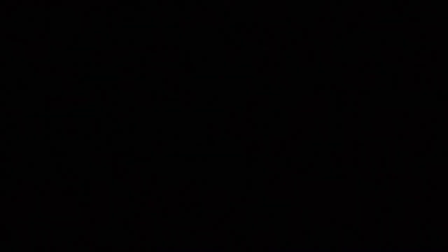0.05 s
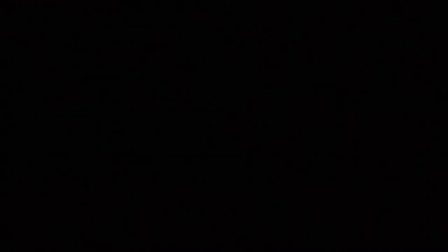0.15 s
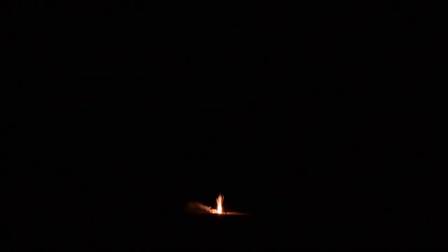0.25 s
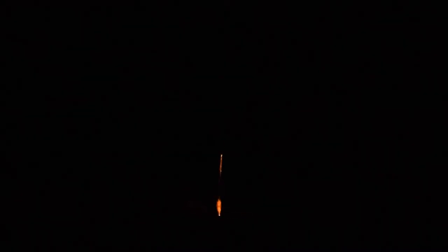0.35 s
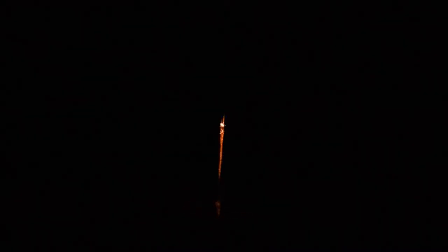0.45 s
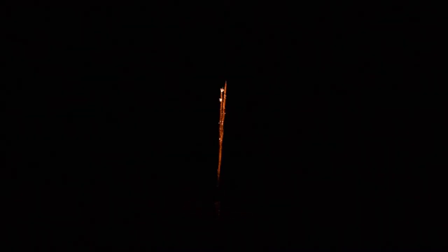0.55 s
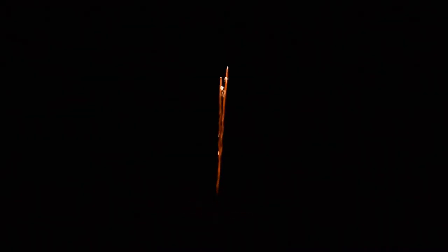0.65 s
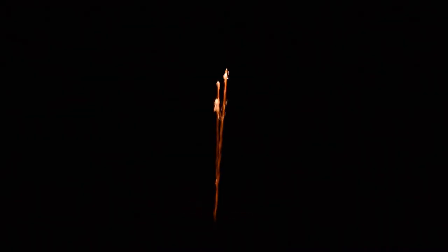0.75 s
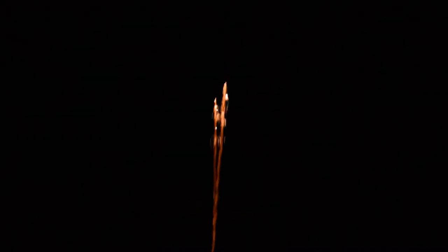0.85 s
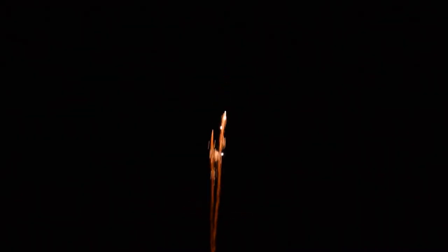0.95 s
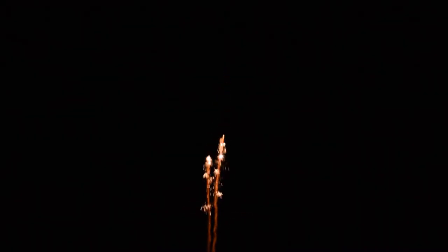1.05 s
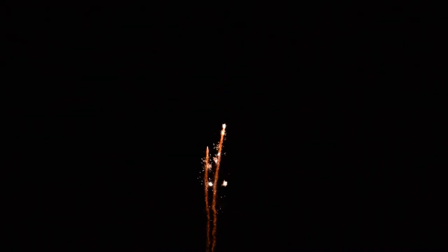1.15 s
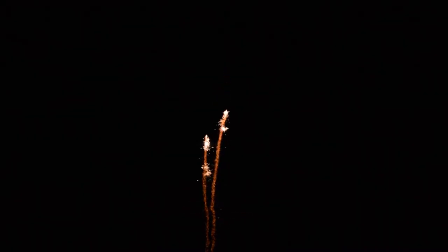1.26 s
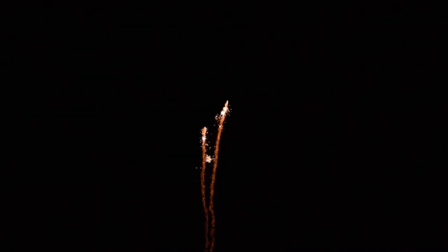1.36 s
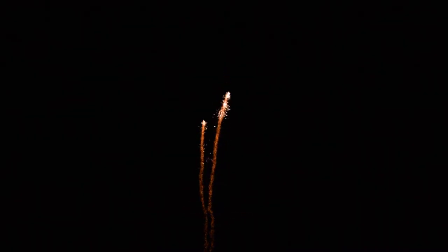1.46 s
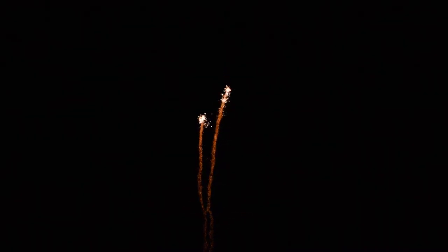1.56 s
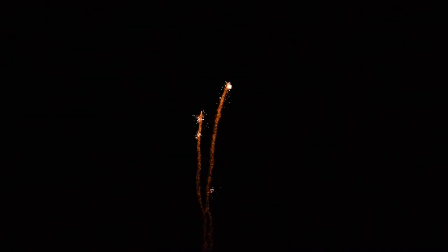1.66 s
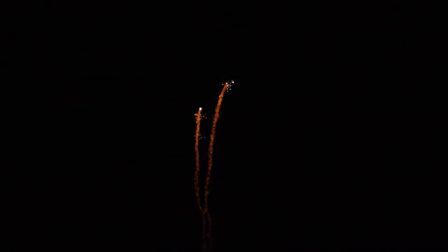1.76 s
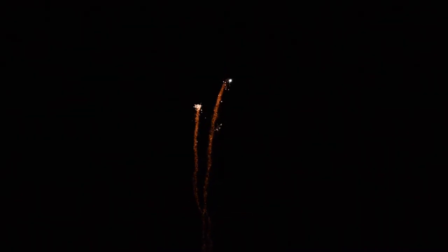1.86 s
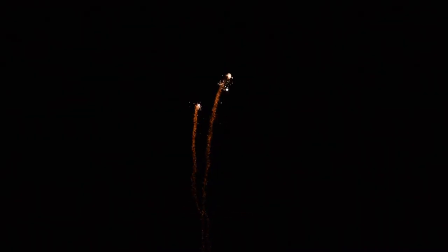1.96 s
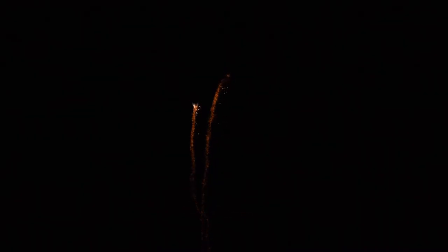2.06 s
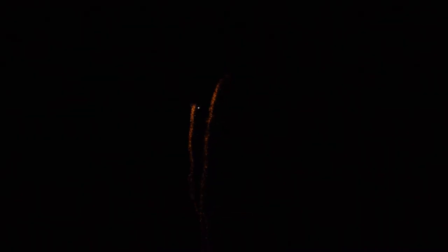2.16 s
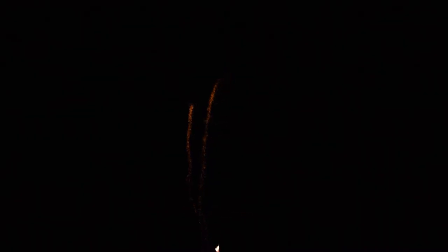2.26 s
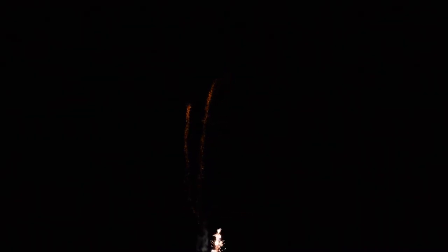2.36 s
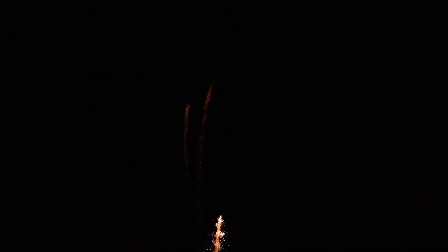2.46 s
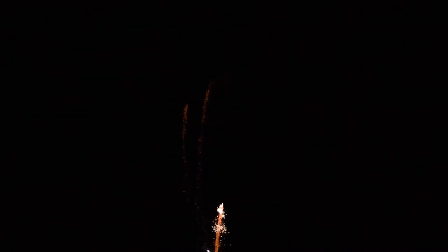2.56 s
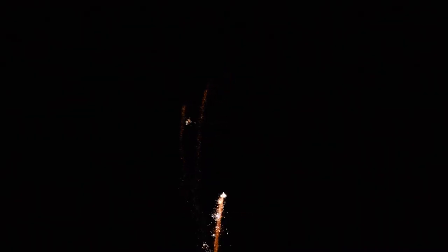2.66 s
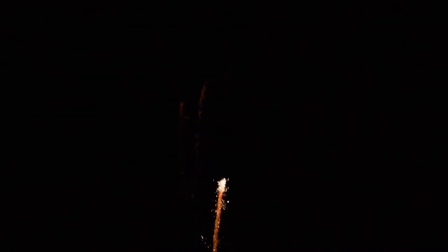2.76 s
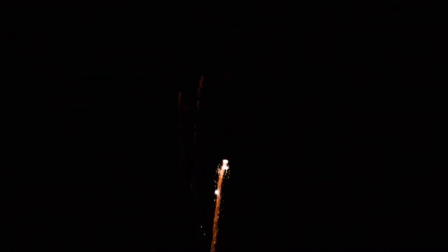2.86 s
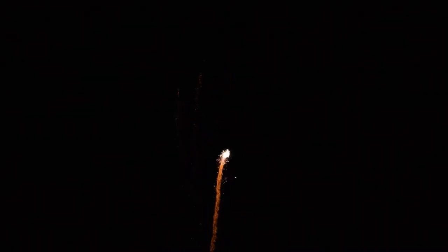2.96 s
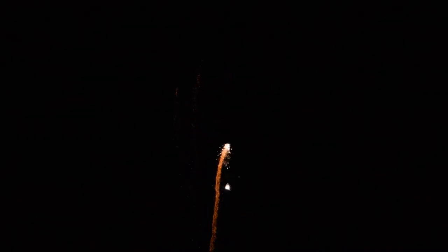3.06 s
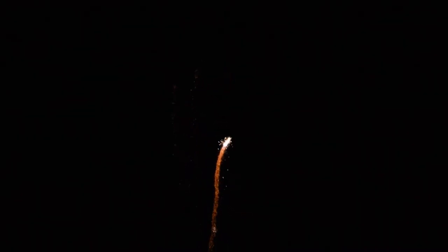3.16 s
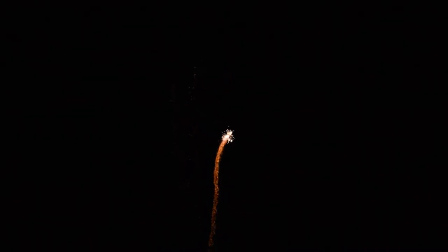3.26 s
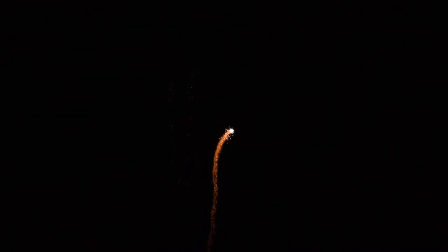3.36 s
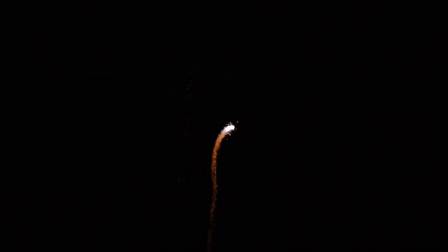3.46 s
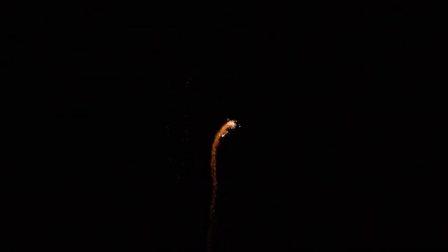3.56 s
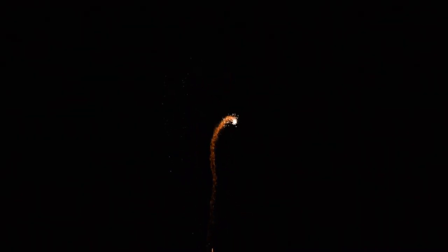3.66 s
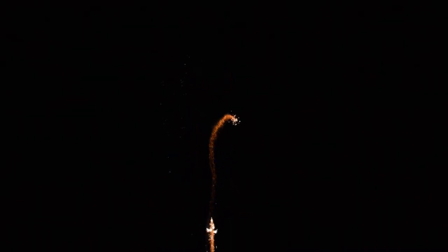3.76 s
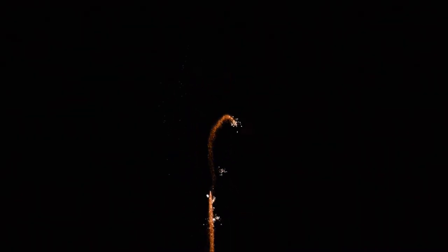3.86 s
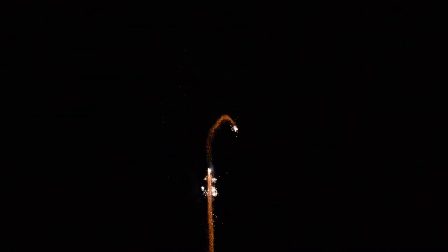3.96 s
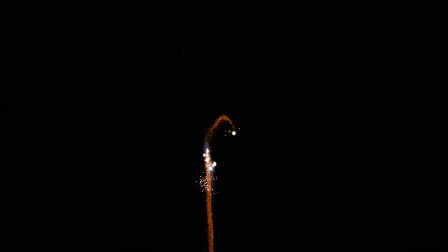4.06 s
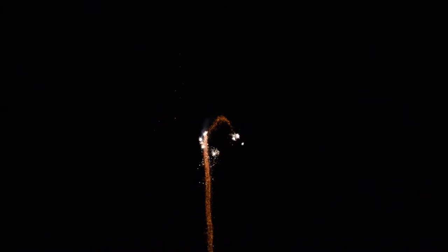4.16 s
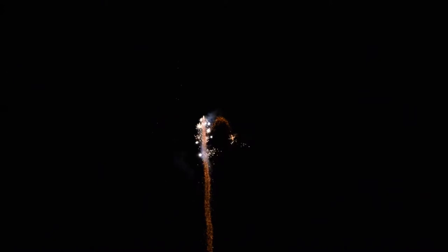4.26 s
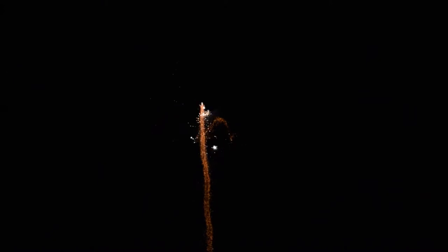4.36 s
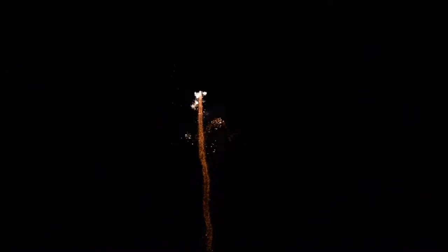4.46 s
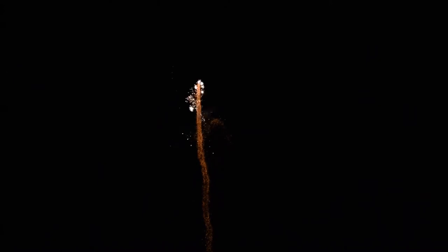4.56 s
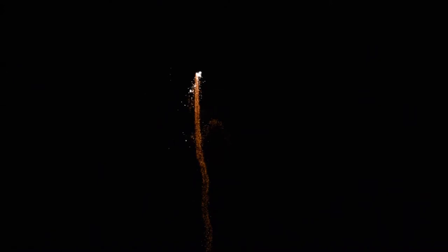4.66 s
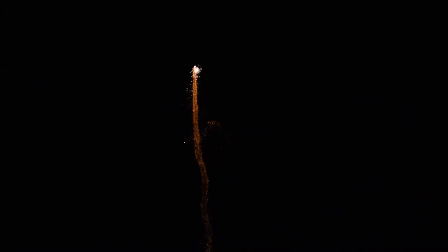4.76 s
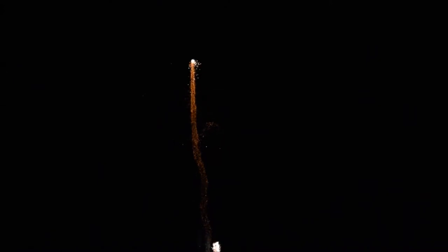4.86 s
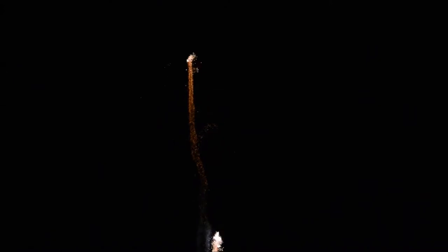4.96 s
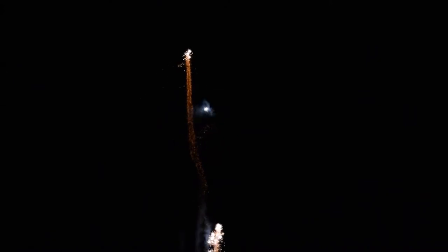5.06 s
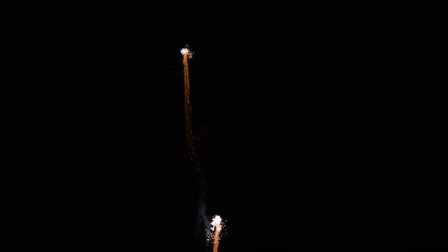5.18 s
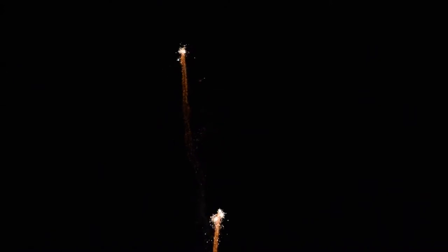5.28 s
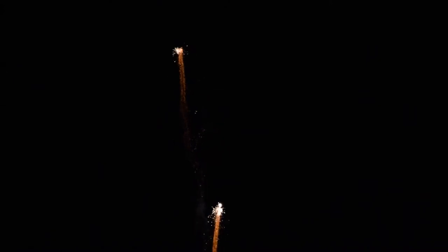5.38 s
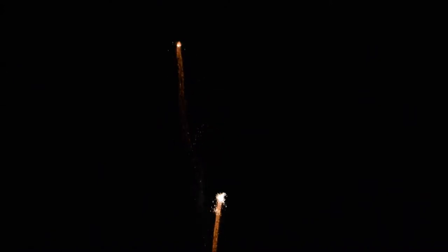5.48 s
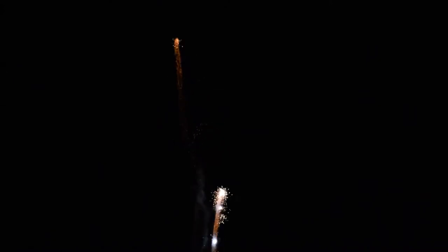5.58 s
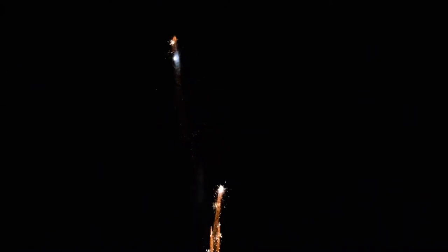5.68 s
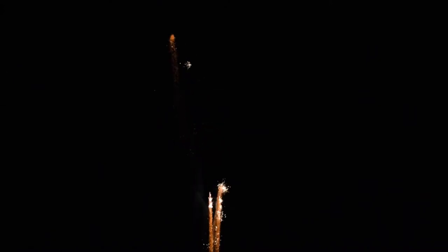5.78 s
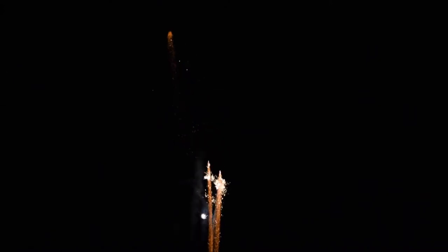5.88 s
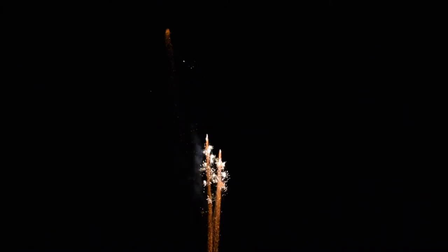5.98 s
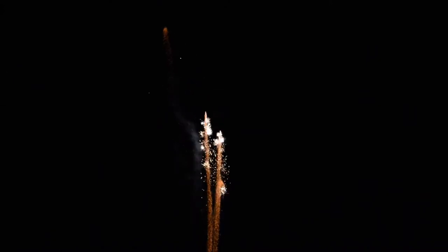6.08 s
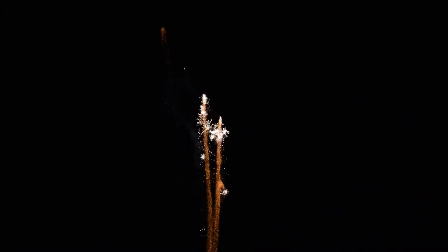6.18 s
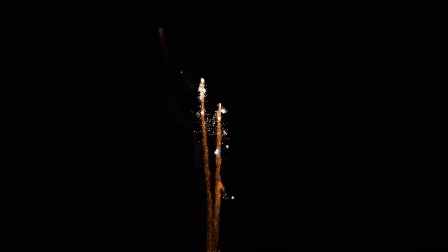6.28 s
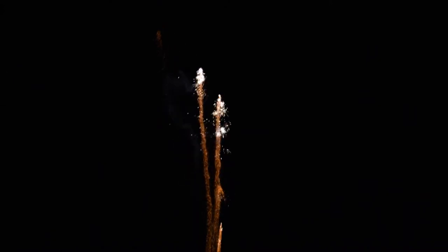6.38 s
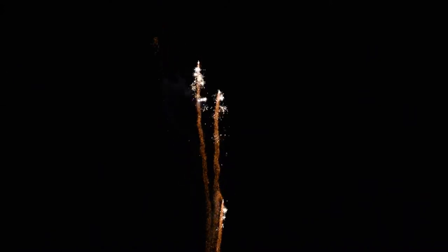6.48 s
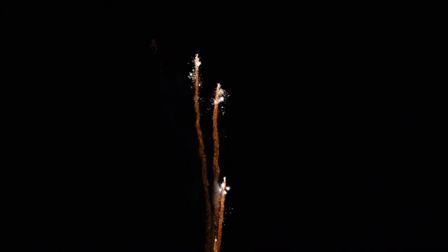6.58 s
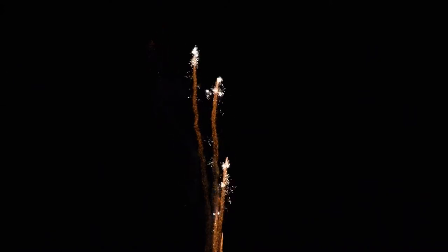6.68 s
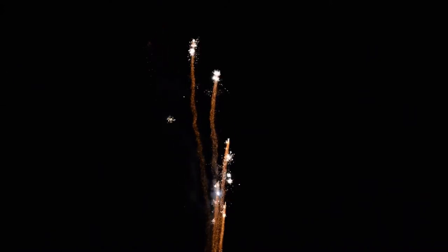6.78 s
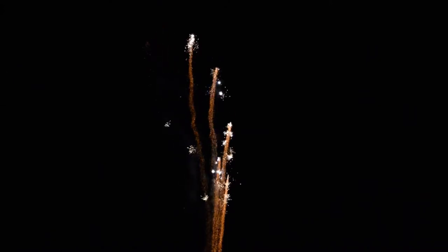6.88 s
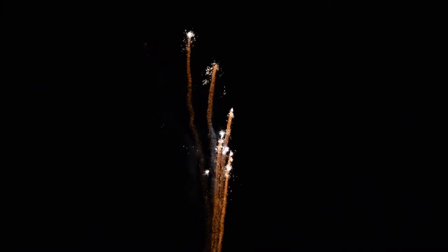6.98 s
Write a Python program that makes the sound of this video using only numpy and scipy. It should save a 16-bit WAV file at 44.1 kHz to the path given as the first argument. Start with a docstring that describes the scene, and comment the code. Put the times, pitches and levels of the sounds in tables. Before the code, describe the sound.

Hollow tube thumps fire crackling firework comets outdoors, their snapping pops swelling in bursts and echoing off distant walls and trees.

```python
"""Crackling stars shed by rising comets: each pop is a push and suction, heard straight and off the ground.
The comets come from a firework cake in the open at night, whose lift charges thump out of cardboard tubes.
Far walls and trees return pops and thumps; burning metal fizzes over night air, wind and a first rustle.
A small single microphone with a ringing port clips on the loudest blasts."""
import sys
import numpy as np
from scipy import signal
from scipy.fft import rfft, irfft
from scipy.io import wavfile

SR = 44100
rng = np.random.default_rng(int(sys.argv[2]) if len(sys.argv) > 2 else 0)


def persist_wave(psi):
    """Save psi, clipped to +-1, as 16-bit WAV."""
    counts = np.round(np.clip(psi, -1, 1) * 32767).astype(np.int16)
    wavfile.write(sys.argv[1], SR, np.atleast_2d(counts).T)


N = 310023
TIME = np.arange(N) / SR

# Lift charges. Each row: blast in seconds, blast level in dB, gas sputter before it in dB, bright crack in dB.
LAUNCHES = [(.4110, -6, -14, -10), (1.8869, -12.5, -12, -23), (3.6037, -4.5, -11, -14.5),
            (4.4361, -17, -30, -32), (5.5344, -11.5, -12.5, -24), (5.622, -8.5, -35, -12.5),
            (6.282, -7, -36, -15), (6.529, -5.5, -19, -12), (6.618, -8, -22, -12), (7.0168, -8, -9, -20)]
# Comets that shed stars. Each row: index of its launch, ground echo lag at the top in ms,
# time constant of the climb in seconds.
COMETS = [(0, 4.3, .66), (0, 3.9, .68), (1, 3.1, .6), (2, 4.1, .76), (3, 2.1, .5), (4, 3.7, .5),
          (5, 3.7, .6), (6, 4.2, .85)]
# Fizz of the burning comets. Each row: time in seconds, level in dB.
FIZZ = [(0.5, -75), (0.57, -69), (0.86, -59), (1.28, -54), (1.61, -47.5), (2.32, -58.5), (2.9, -48),
        (4.01, -53), (4.15, -47.5), (6.01, -46), (6.26, -42), (7.03, -44)]


def amp(db):
    """Decibels to gain."""
    return 10 ** (np.asarray(db) / 20)


def rms_one(x):
    """Scale to rms 1."""
    return x / np.sqrt(np.mean(x ** 2) + 1e-20)


def in_time(rows):
    """Columns of a curve table, interpolated sample by sample."""
    seconds, *columns = np.transpose(rows)
    return [np.interp(TIME, seconds, column) for column in columns]


def band(x, low_hz, high_hz):
    """Butterworth band-pass."""
    sos = signal.butter(2, [low_hz, min(high_hz, .45 * SR)], "band", fs=SR, output="sos")
    return signal.sosfilt(sos, x)


def place(seconds, shapes):
    """Sum short shapes (events x samples) at their times."""
    at = np.round(seconds * SR).astype(int)[:, None] + np.arange(shapes.shape[1])
    return np.bincount(at.ravel(), shapes.ravel(), N + SR)[:N]


def bell(x, hz, width_hz, gain_db):
    """Second-order peak or dip of the given width."""
    a, w = amp(gain_db / 2), 2 * np.pi * hz / SR
    q = np.pi * width_hz / SR
    middle = -2 * np.cos(w)
    return signal.lfilter([1 + q * a, middle, 1 - q * a], [1 + q / a, middle, 1 - q / a], x)


def night():
    """Still air as coloured noise, lumpy low wind on the port, and a rustle dying away at the start."""
    # Still air spectrum. Each row: frequency in Hz, relative level in dB per Hz.
    air_spectrum = [(60, -33), (127, -13), (170, -29.5), (293, -21.5), (357, -20), (472, -29),
                    (2550, -45.5), (2800, -33), (3050, -45), (16000, -70)]
    # Wind on the microphone. Each row: time in seconds, level in dB.
    wind_levels = [(0, -58), (.58, -50), (.64, -48), (.84, -48), (.87, -36), (1.08, -40), (1.16, -52),
                   (2.27, -60), (2.33, -50.5), (2.98, -58), (4.64, -68), (6.56, -58), (7.03, -61)]
    # Rustle. Each row: time in seconds, low band in dB, high band in dB.
    rustle_levels = [(0, -40.5, -54.5), (.045, -48.5, -61.5), (.07, -57, -77), (.09, -100, -100)]
    air_db = -63

    hz = np.maximum(np.arange(N // 2 + 1) * SR / N, 1)
    known_hz, known_db = np.transpose(air_spectrum)
    colour = amp(np.interp(np.log(hz), np.log(known_hz), known_db))
    air = amp(air_db) * rms_one(irfft(rfft(rng.standard_normal(N)) * colour, N))
    wind = amp(in_time(wind_levels)[0]) * rms_one(band(rng.standard_normal(N), 9.7, 25.0))
    low_db, high_db = in_time(rustle_levels)
    low = amp(low_db) * rms_one(band(rng.standard_normal(N), 50, 142))
    high = amp(high_db) * rms_one(band(rng.standard_normal(N), 550, 8200))
    return air + wind + low + high


def surroundings(x):
    """Close scatter at once; thin returns, then the far walls and trees, lumpy, dying band by band."""
    # Octave bands. Each row: centre in Hz, return level in dB, t60 in seconds.
    returns = [(195, -4, 1), (321, -2.5, 0.87), (700, -8.5, 1), (1580, -8, 0.89), (2930, -8.5, 0.58),
               (5300, -9, 0.41), (12200, -4.5, 0.28)]
    far_wall_s, before_wall_db = .036, -8
    near_db, near_t60_s = -14, .025

    t = np.arange(SR) / SR
    wall_rise = np.clip((t - far_wall_s) / 0.0069, 0, 1)
    arrived = np.maximum(wall_rise, amp(before_wall_db) * (t > .002))
    lumps = amp(1.5 * rms_one(band(rng.standard_normal(SR), 15, 60)))
    far = 0
    for hz, return_db, t60_s in returns:
        octave = rms_one(band(rng.standard_normal(SR), hz / np.sqrt(2), hz * np.sqrt(2))) * np.sqrt(hz / SR)
        far = far + amp(return_db - 60 * t / t60_s) * octave / np.sqrt(t60_s * SR / np.log(1e6))
    near_decay = amp(near_db - 60 * t / near_t60_s) / np.sqrt(near_t60_s * SR / np.log(1e6))
    near = rng.standard_normal(SR) * near_decay * (t > .0005)
    return signal.fftconvolve(x, arrived * lumps * far + near)[:N]


def fizz():
    """Burning metal in the comet tails: fine noise grains of uneven strength, band-passed."""
    grains = rng.standard_normal(N) * amp(4.9 * rng.exponential(1, N).clip(0, 5))
    fade_in = np.clip((TIME - .5) / 0.072, 0, 1)
    return amp(in_time(FIZZ)[0]) * rms_one(band(grains, 260, 7500)) * fade_in


def low_echoes(x):
    """Delayed, dull copies off things standing near the cake."""
    # Each row: lag in seconds, level in dB.
    echoes = [(.0082, -14.5), (0.0106, -17), (.017, -15)]
    dull = signal.lfilter(*signal.butter(2, 550, fs=SR), x)
    return sum(amp(echo_db) * np.interp(TIME - lag_s, TIME, dull, left=0) for lag_s, echo_db in echoes)


def blast_from_above():
    """What the tubes throw upward, to feed the surroundings: one plain blow, strongest in the low middle."""
    s, blast_db, _, crack_db = np.transpose(LAUNCHES)
    body = band(place(s, amp(blast_db + 29.0)[:, None]) + 1e-18, 355, 1110)
    # the cap bursts higher up
    bright = band(place(s + .002, amp(crack_db + 12.5)[:, None]) + 1e-18, 1200, 10700)
    return body + bell(bright, 3530, 1900, 12.4)


def launches():
    """Gas sputters, the blast leaves as one quick swing, then the tube empties and refills in one slow swing."""
    # Resonances after the blast. Each row: frequency in Hz, kick relative to the blast in dB, t60 in seconds.
    tube_modes = [(288, -32, 0.049), (126, -16.5, 0.037), (1020, -14.5, 0.012)]
    mean_blast_ms, mean_refill_ms, refill_db = 0.88, 3.3, -1.5
    s, blast_db, sputter_db, crack_db = np.transpose(LAUNCHES)
    t_ms = np.arange(220) / SR * 1000

    swell = np.linspace(0, 1, 180) ** 1.1
    gas = amp(sputter_db)[:, None] * swell * rng.standard_normal((len(s), 180))
    sputter = band(place(s - 170 / SR, gas), 600, 2800)

    # the paper cap tears
    tear = amp(crack_db)[:, None] * np.exp(-t_ms / .6) * rng.standard_normal((len(s), 220))
    crack = bell(band(place(s - .0003, tear), 1400, 20000), 4930, 1200, 2.9)

    vary = 1 + .04 * rng.standard_normal((len(s), 2))  # no two tubes are alike
    quick_ms, slow_ms = mean_blast_ms * vary[:, :1], mean_refill_ms * vary[:, 1:]
    quick = np.sin(2 * np.pi * np.clip(t_ms / quick_ms, 0, 1))
    slow = np.sin(2 * np.pi * np.clip((t_ms - 0.99 * quick_ms) / slow_ms, 0, 1))
    swing = quick - amp(refill_db - 1.22 * t_ms) * slow
    out = sputter + crack + place(s, amp(blast_db)[:, None] * swing)

    for hz, level_db, t60_s in tube_modes:
        r, w = amp(-60 / (t60_s * SR)), 2 * np.pi * hz / SR
        kick_db = blast_db + level_db + 3 * rng.standard_normal(len(s))
        kick = place(s, amp(kick_db)[:, None])
        out = out + signal.lfilter([0, np.sin(w)], [1, -2 * r * np.cos(w), r * r], kick + 1e-18)
    return out


def comet_ages(seconds):
    """Seconds since launch: events x comets."""
    fired = np.array(LAUNCHES)[np.array(COMETS)[:, 0].astype(int), 0]
    return seconds[:, None] - fired


def ground_lag_ms(seconds, comet):
    """The ground echo lags more as a comet climbs; the climb slows toward the top."""
    scatter_ms = .06
    _, top_ms, climb_s = np.array(COMETS)[comet].T
    age = comet_ages(seconds)[np.arange(len(seconds)), comet]
    lag_ms = top_ms * (1 - np.exp(-np.maximum(age, 0) / climb_s))
    return lag_ms + scatter_ms * rng.standard_normal(N)[(seconds * SR).astype(int)]


def small_stars():
    """Stars too many to count, in random clumps and flurries: rows (s, dB, comet), spread over burning comets."""
    # Clusters going off almost at once. Each row: middle in seconds, length in seconds, added stars per second.
    flurries = [(.86, .016, 500), (.99, .014, 700), (1.82, .02, 400), (2.2, .03, 300), (2.554, .014, 1500),
                (2.69, .045, 500), (2.762, .03, 500), (3.39, .02, 400), (4.92, .03, 400), (5.72, .03, 400),
                (6.023, .015, 600)]
    mean_per_s, clump_db = 110, 7.
    over_fizz_db, spread_db = 22.5, 3.5
    first_star_s, burnt_out_s = .3, 2.3  # comet age

    fizz_db, = in_time(FIZZ)
    draw = rng.random((3, N))
    clumps = amp(clump_db * rms_one(band(rng.standard_normal(N), 8, 60)))
    per_s = mean_per_s * clumps / clumps.mean()
    for middle_s, length_s, rate in flurries:
        per_s = per_s + rate * (np.abs(TIME - middle_s) < length_s / 2)
    at = np.flatnonzero((draw[0] < per_s / SR) & (TIME > .56))
    level_db = fizz_db[at] + over_fizz_db - spread_db * np.log(draw[1, at] + 0.027)

    age = comet_ages(at / SR)
    burnt_out = np.sum(age > burnt_out_s, axis=1)
    burning = np.sum(age > first_star_s, axis=1) - burnt_out
    comet = burnt_out + np.floor(burning * draw[2, at])
    return np.transpose([at / SR, level_db, comet])


def star_pops(seconds, level_db, lag_ms):
    """Blast waves: a sudden push, then a long shallow suction of equal area; bigger charges push longer."""
    push_ms, suck_ms = .05, .4  # before scaling by size
    ground_db, ground_hz = -8., 2600

    t_ms = np.arange(160) / SR * 1000
    size = amp(level_db + 12)[:, None] ** .07
    push, suck = push_ms * size, suck_ms * size
    wave = np.exp(-t_ms / push) - push / suck * np.exp(-t_ms / suck)
    wave = amp(level_db + 3.)[:, None] * (wave - wave.mean(axis=1, keepdims=True))
    straight = place(seconds - 2 / SR, wave)
    bounced = place(seconds + lag_ms / 1000, wave)
    soil = signal.butter(2, ground_hz, fs=SR)  # soft ground returns a dull copy
    return straight + amp(ground_db) * signal.lfilter(*soil, bounced)


def scene():
    """Stars burst at many places in the sky, and each place is answered differently by the surroundings."""
    # Loud stars. Each row: time in seconds, level in dB, index of its comet.
    loud_stars = [(0.6061, -24, 0), (0.7213, -22, 0), (0.7821, -22, 0), (0.8195, -29, 0), (0.834, -27, 0),
                  (0.858, -28, 0), (0.8959, -27, 1), (0.9153, -17, 1), (0.9202, -21, 0), (0.9783, -25, 1),
                  (0.992, -23, 1), (1.0198, -17, 0), (1.0277, -24, 0), (1.0409, -18, 1), (1.043, -16, 1),
                  (1.061, -23, 0), (1.0837, -19, 1), (1.1202, -2, 1), (1.1414, -13, 1), (1.1555, -7, 0),
                  (1.189, -18, 1), (1.2105, -17, 1), (1.2334, 0, 0), (1.2385, -14, 1), (1.2458, -2, 0),
                  (1.2641, -6, 1), (1.2651, -9, 1), (1.2799, -2, 1), (1.2961, -10, 1), (1.3312, -17, 0),
                  (1.3559, -2, 0), (1.3831, -9, 0), (1.43, -15, 0), (1.4382, 2, 1), (1.4455, -10, 0),
                  (1.4599, 3, 1), (1.4766, -7, 0), (1.4866, -13, 0), (1.4985, -15, 0), (1.5279, -16, 1),
                  (1.5636, -2, 1), (1.5875, -14, 0), (1.5939, -6, 0), (1.6244, -9, 0), (1.6525, -8, 0),
                  (1.6987, -1, 1), (1.7644, -12, 0), (1.8005, 3, 0), (1.8121, -2, 0), (1.9018, -6, 1),
                  (2.0134, -14, 1), (2.0658, -19, 0), (2.0825, -15, 0), (2.1071, -11, 1), (2.1211, -13, 1),
                  (2.1397, -16, 0), (2.1898, -15, 2), (2.369, -26, 2), (2.386, -26, 2), (2.3979, -25, 2),
                  (2.4199, -24, 2), (2.4477, -25, 2), (2.4522, -24, 2), (2.4682, -13, 2), (2.478, -19, 2),
                  (2.4884, -16, 2), (2.5169, -16, 2), (2.5258, -22, 2), (2.5668, -7, 2), (2.5921, -18, 2),
                  (2.6138, -9, 2), (2.7197, -15, 2), (2.8107, -18, 2), (2.8322, -1, 2), (2.8406, -8, 2),
                  (2.8858, -6, 2), (2.9002, -6, 2), (2.9778, -9, 2), (3.0023, -2, 2), (3.0042, 1, 2),
                  (3.0542, -16, 2), (3.0704, -13, 2), (3.1013, -6, 2), (3.1611, -14, 2), (3.2046, -9, 2),
                  (3.249, -19, 2), (3.2839, -10, 2), (3.2917, 2, 2), (3.3047, -17, 2), (3.3484, -18, 2),
                  (3.4143, -13, 2), (3.4166, -3, 2), (3.438, -16, 2), (3.5429, -14, 2), (3.5789, -15, 2),
                  (3.6598, -8, 2), (3.6801, -14, 2), (3.7044, -12, 2), (3.7172, -10, 2), (3.7423, -3, 2),
                  (3.7991, -1, 2), (3.8056, -16, 2), (3.8166, -16, 2), (3.839, -20, 2), (3.8761, -13, 2),
                  (3.9533, -19, 2), (3.9861, 4, 2), (4.0022, -3, 2), (4.0307, 5, 2), (4.0537, -13, 2),
                  (4.0982, -1, 2), (4.114, -13, 3), (4.1451, -6, 3), (4.1581, -8, 3), (4.1773, -17, 3),
                  (4.2049, -14, 2), (4.2082, -11, 2), (4.2605, -11, 3), (4.2627, -10, 3), (4.2727, -14, 3),
                  (4.3368, -4, 3), (4.4001, -18, 3), (4.4284, -9, 3), (4.4473, -14, 3), (4.4657, -2, 3),
                  (4.5617, -14, 3), (4.5915, -11, 3), (4.6108, -8, 3), (4.6868, -3, 3), (4.6968, -9, 3),
                  (4.7125, -3, 3), (4.7814, -15, 3), (4.8012, -14, 4), (4.8383, -17, 4), (4.8743, -13, 4),
                  (4.9091, -9, 4), (4.9185, -14, 4), (4.9532, -16, 3), (4.9989, -4, 4), (5.0032, -4, 3),
                  (5.0868, -13, 4), (5.101, -15, 4), (5.1146, 0, 4), (5.1315, 1, 3), (5.1434, -3, 3),
                  (5.1974, -4, 3), (5.2089, 2, 4), (5.2137, -12, 4), (5.2542, -5, 4), (5.2666, -13, 3),
                  (5.3072, -6, 4), (5.3149, 4, 3), (5.318, -8, 3), (5.3328, -11, 4), (5.3474, -16, 4),
                  (5.3709, -8, 4), (5.4035, -9, 3), (5.4105, -11, 4), (5.4303, 0, 4), (5.4493, -17, 3),
                  (5.5281, -10, 3), (5.5289, -4, 3), (5.5671, -16, 3), (5.6143, 4, 4), (5.6499, -14, 4),
                  (5.7147, -11, 4), (5.7407, -10, 4), (5.7435, -7, 4), (5.7621, 0, 4), (5.7779, -14, 4),
                  (5.8442, -4, 3), (5.848, -3, 3), (5.8641, -3, 5), (5.8803, -7, 3), (5.8965, -2, 4),
                  (5.9531, -13, 3), (5.9656, 1, 4), (6.0413, -9, 4), (6.0813, -13, 6), (6.0868, -9, 4),
                  (6.0944, -3, 6), (6.108, -11, 5), (6.1166, -13, 6), (6.1239, -3, 4), (6.1473, -3, 6),
                  (6.1938, -9, 6), (6.1993, -13, 4), (6.2061, -2, 6), (6.2136, -9, 6), (6.2283, -12, 5),
                  (6.2408, -13, 6), (6.2574, -3, 6), (6.262, 5, 4), (6.2719, -8, 6), (6.297, -12, 5),
                  (6.3034, -4, 6), (6.3315, -14, 6), (6.3385, -4, 6), (6.3487, -10, 6), (6.3587, 5, 6),
                  (6.363, 1, 6), (6.391, 1, 6), (6.3955, -1, 6), (6.4148, -3, 6), (6.4227, -12, 6),
                  (6.4268, 4, 6), (6.4416, -1, 6), (6.449, -11, 6), (6.4871, 0, 6), (6.4889, -9, 6),
                  (6.4956, 0, 5), (6.505, -14, 6), (6.5334, -14, 6), (6.5939, -10, 6), (6.6403, -13, 6),
                  (6.6805, -3, 5), (6.7109, -12, 5), (6.7165, -7, 6), (6.7244, -4, 6), (6.7335, -9, 5),
                  (6.7447, -3, 6), (6.7812, -15, 7), (6.7963, -15, 6), (6.8287, -12, 7), (6.8659, -10, 5),
                  (6.8714, -13, 6), (6.8966, -12, 6), (6.9232, -11, 4), (6.9375, -10, 7), (6.9675, -6, 5),
                  (6.9774, 1, 6), (6.9831, -4, 7), (6.9905, -8, 7), (7.0072, -13, 7), (7.0218, -12, 7)]
    places = 8
    s, level_db, comet = np.vstack([loud_stars, small_stars()]).T
    stars = np.transpose([s, level_db, ground_lag_ms(s, comet.astype(int))])
    groups = [star_pops(*stars[k::places].T) for k in range(places)]
    sky = sum(pops + surroundings(pops) for pops in groups)
    thumps = launches()
    tubes = thumps + low_echoes(thumps) + surroundings(blast_from_above())
    return np.tile(sky + tubes + fizz() + night(), (2, 1))


def record(dry):
    """One inverting microphone: port colour, hiss, hard overload, bass cut, steep top cut."""
    # Port and housing. Each row: frequency in Hz, width in Hz, gain in dB.
    port = [(5940, 1260, -7.5), (6460, 4200, 8.5), (8400, 1400, 7), (10080, 3250, -9), (14500, 2900, -12)]
    hiss_db, clip_at, cutoff_hz = -66, .5, 17150
    x = -dry
    for hz, width_hz, gain_db in port:
        x = bell(x, hz, width_hz, gain_db)
    x = x + amp(hiss_db) * rng.standard_normal(N)  # amplifier hiss
    x = x / (1 + np.abs(x / clip_at) ** 8) ** (1 / 8)
    x = signal.lfilter(*signal.butter(1, 50, "high", fs=SR), x)
    return signal.sosfilt(signal.cheby2(10, 70, cutoff_hz, fs=SR, output="sos"), x)


dry = scene()
out = record(dry)
persist_wave(out)
```